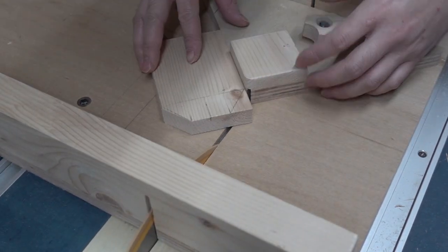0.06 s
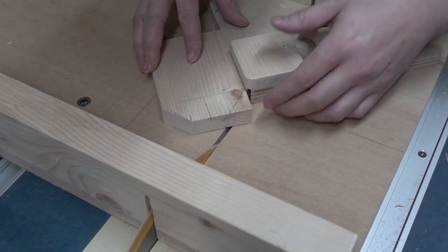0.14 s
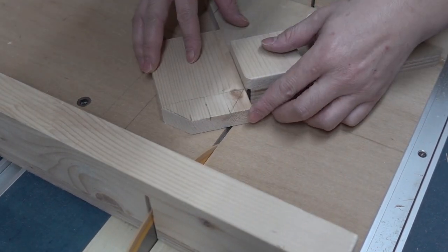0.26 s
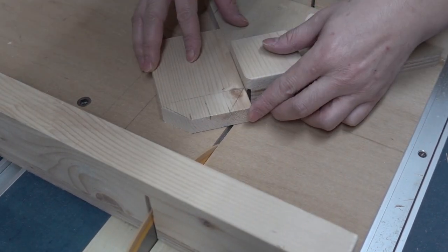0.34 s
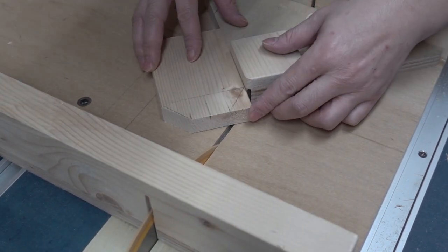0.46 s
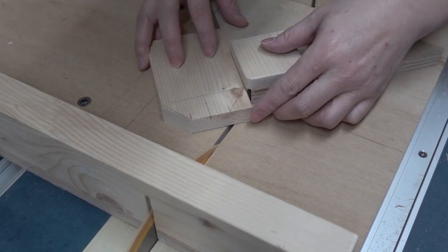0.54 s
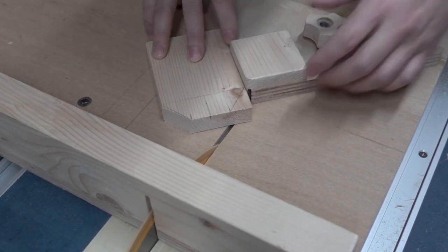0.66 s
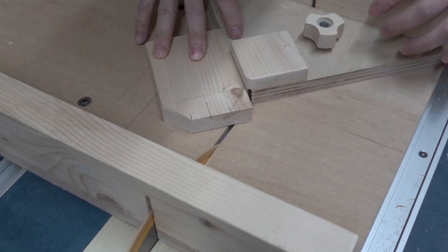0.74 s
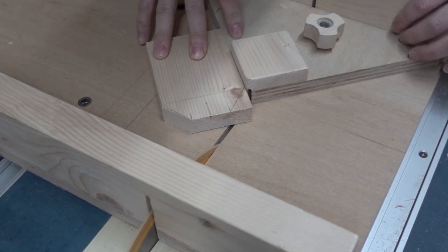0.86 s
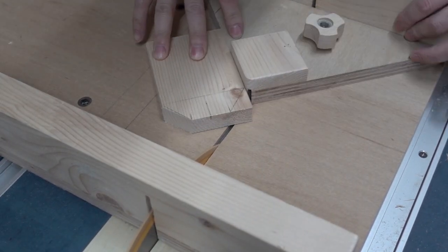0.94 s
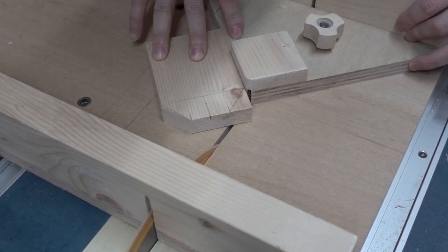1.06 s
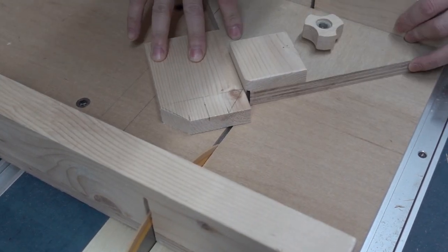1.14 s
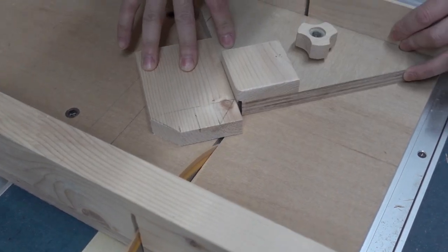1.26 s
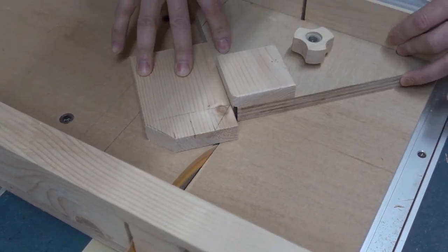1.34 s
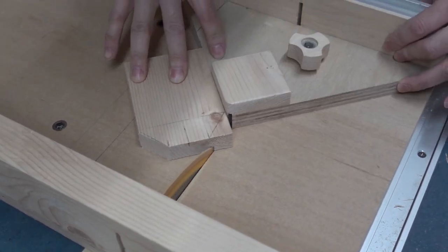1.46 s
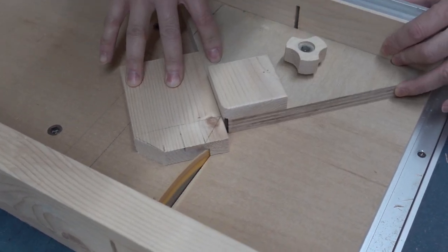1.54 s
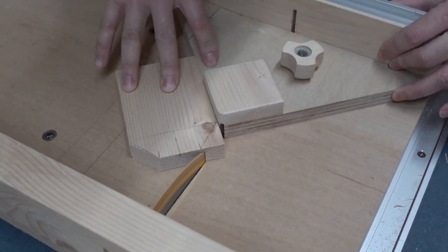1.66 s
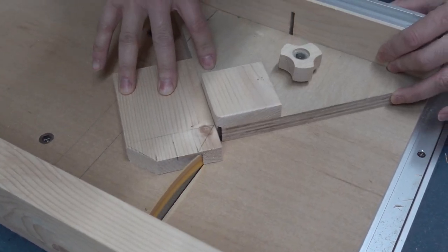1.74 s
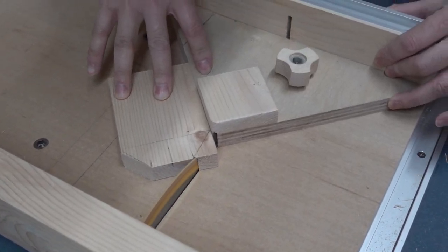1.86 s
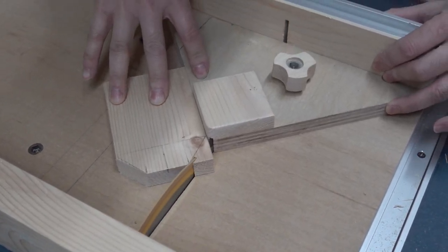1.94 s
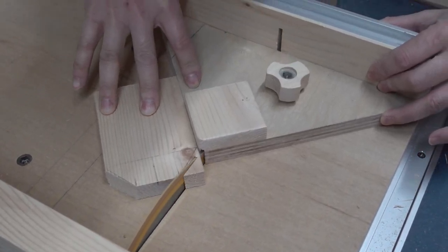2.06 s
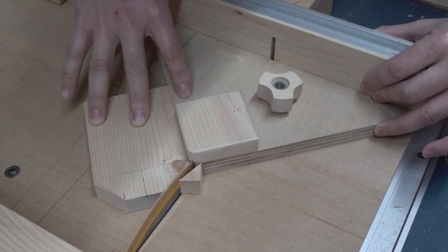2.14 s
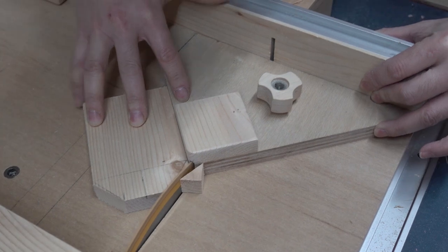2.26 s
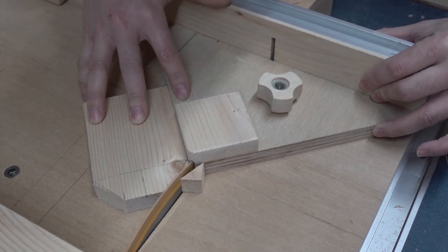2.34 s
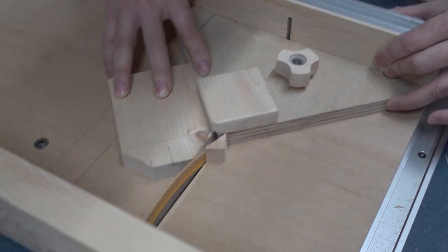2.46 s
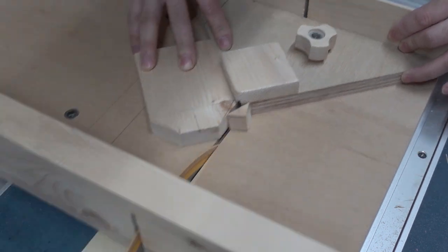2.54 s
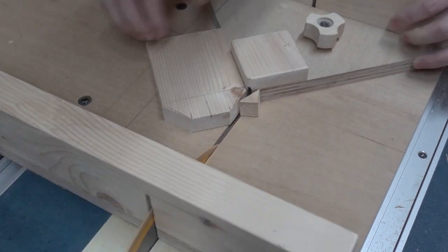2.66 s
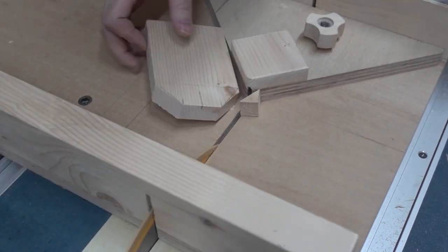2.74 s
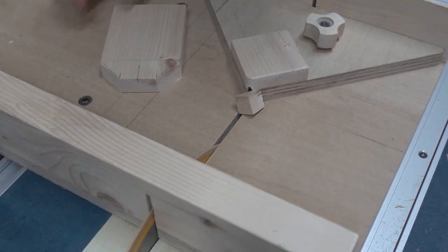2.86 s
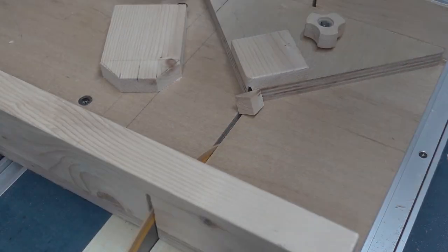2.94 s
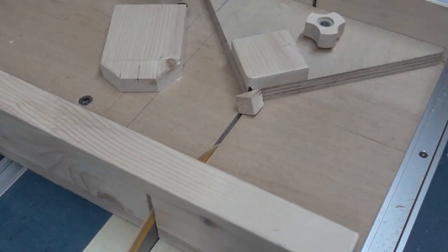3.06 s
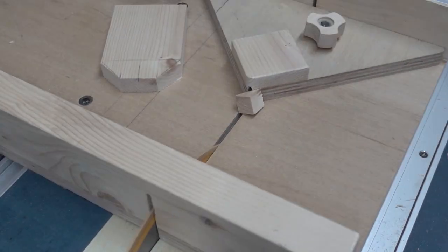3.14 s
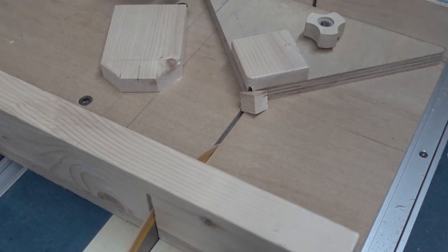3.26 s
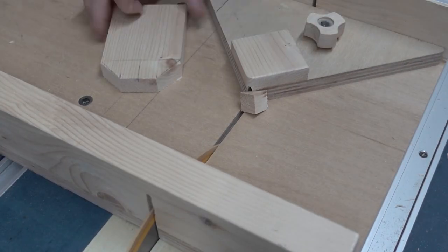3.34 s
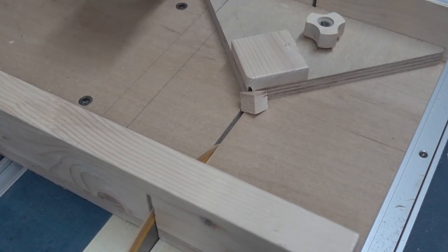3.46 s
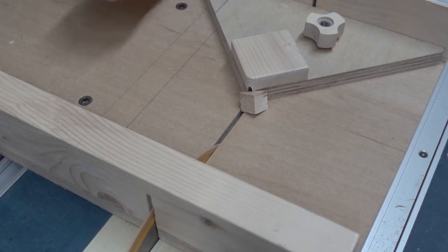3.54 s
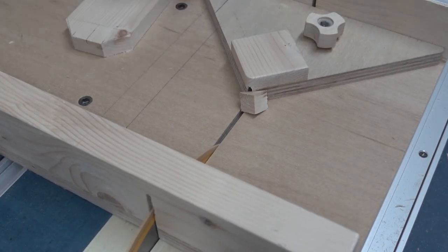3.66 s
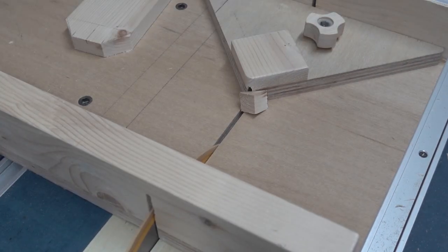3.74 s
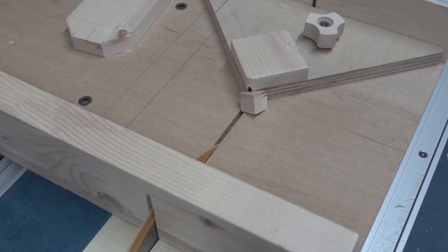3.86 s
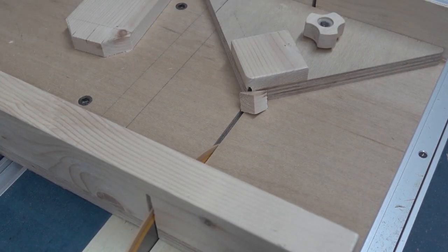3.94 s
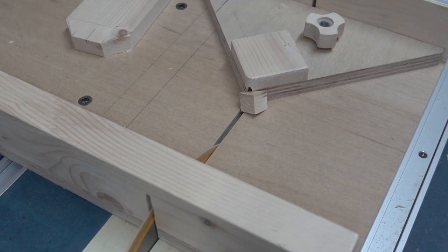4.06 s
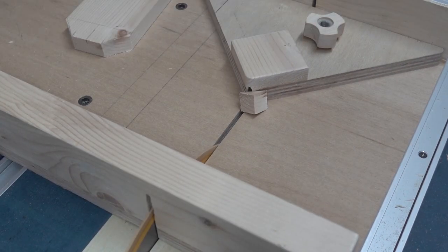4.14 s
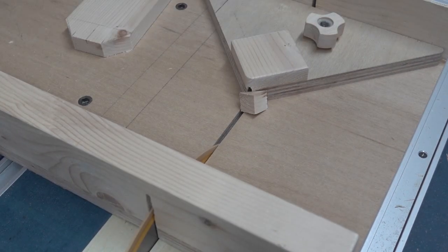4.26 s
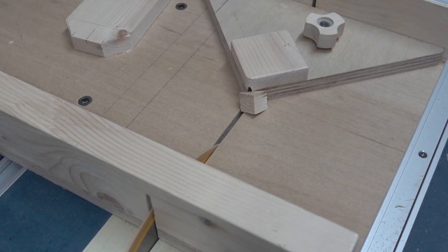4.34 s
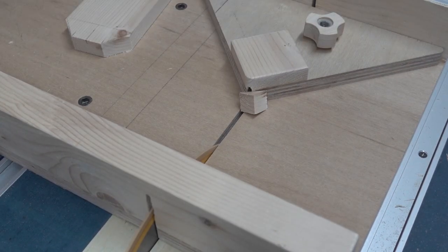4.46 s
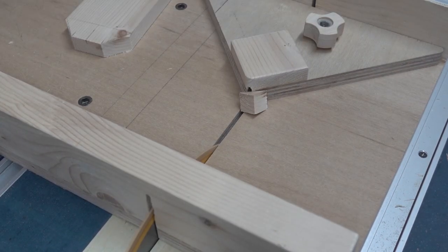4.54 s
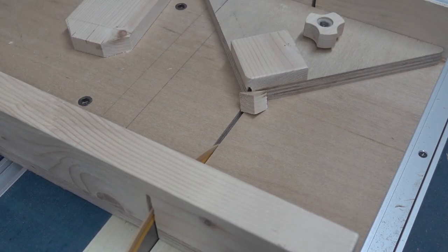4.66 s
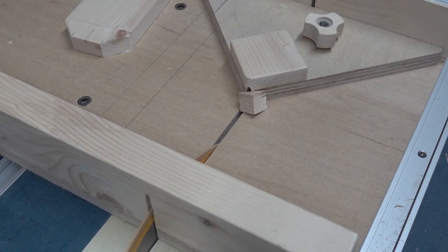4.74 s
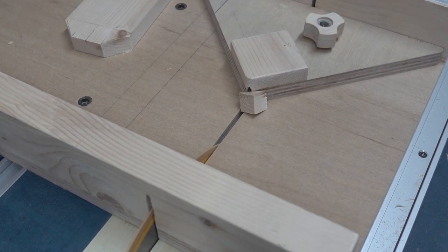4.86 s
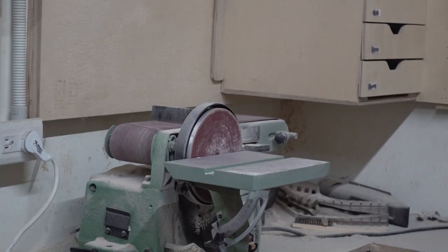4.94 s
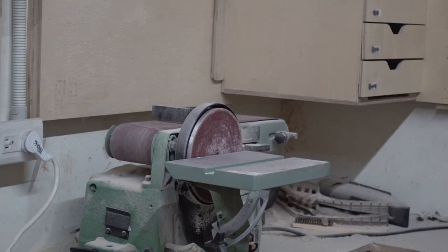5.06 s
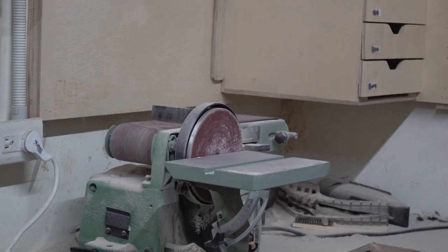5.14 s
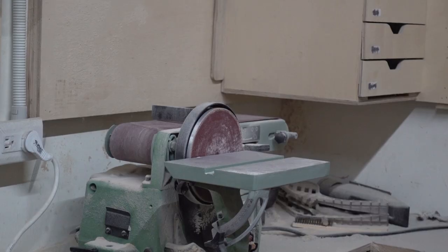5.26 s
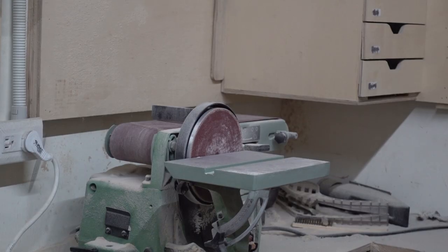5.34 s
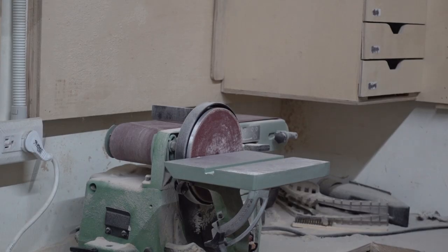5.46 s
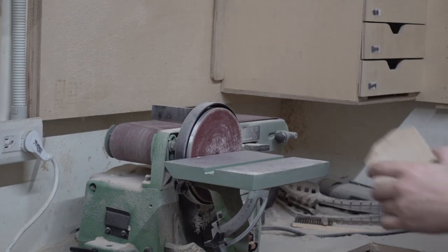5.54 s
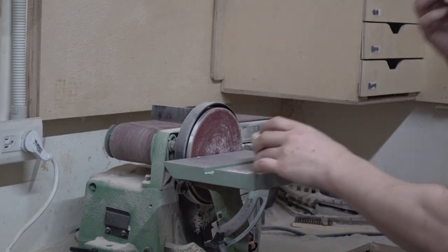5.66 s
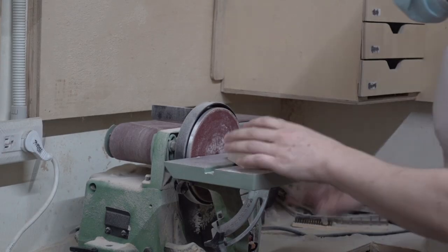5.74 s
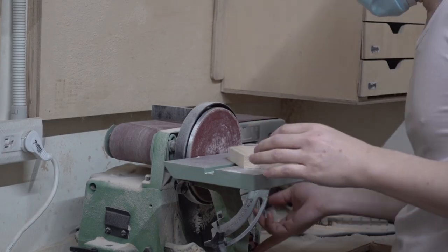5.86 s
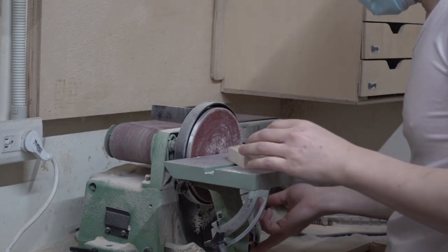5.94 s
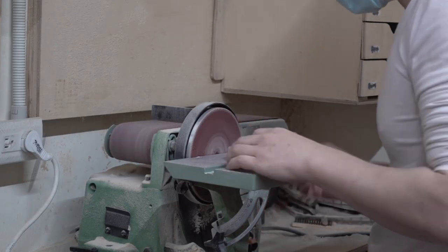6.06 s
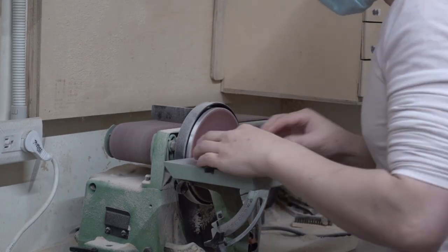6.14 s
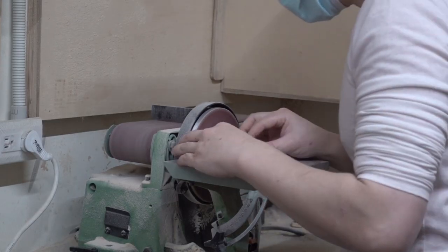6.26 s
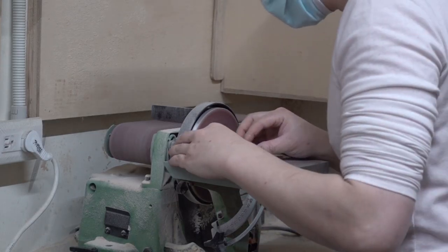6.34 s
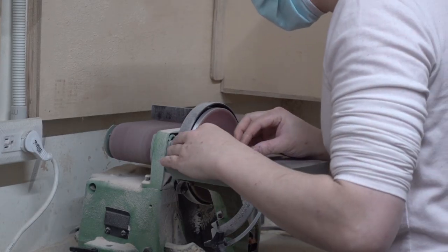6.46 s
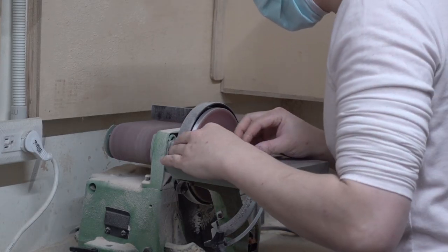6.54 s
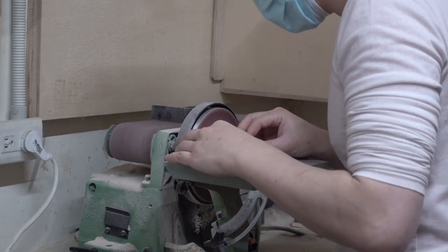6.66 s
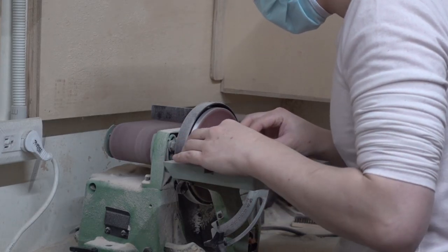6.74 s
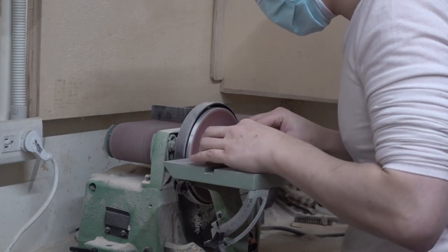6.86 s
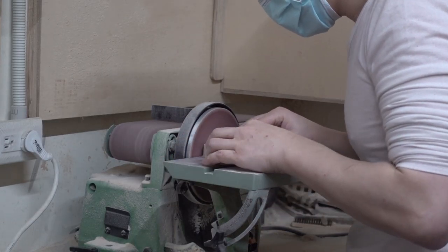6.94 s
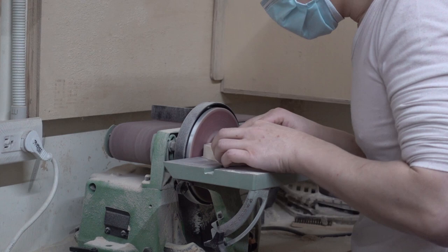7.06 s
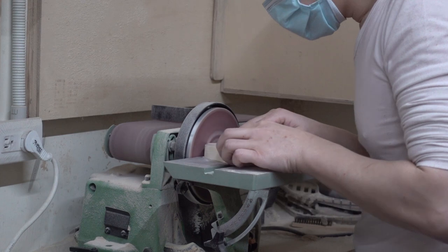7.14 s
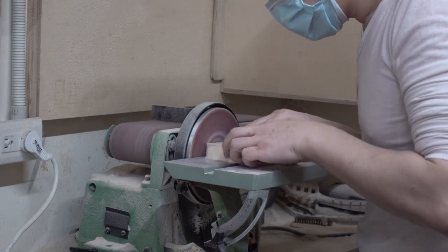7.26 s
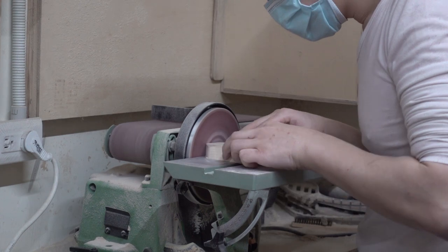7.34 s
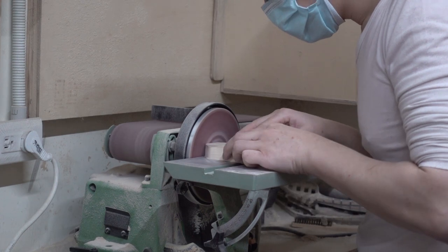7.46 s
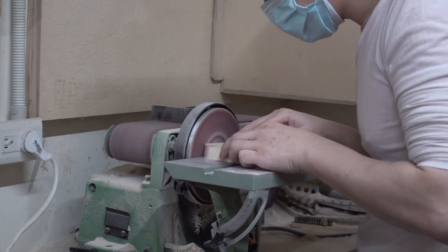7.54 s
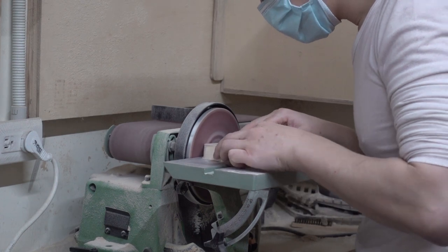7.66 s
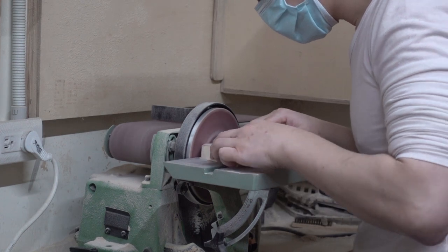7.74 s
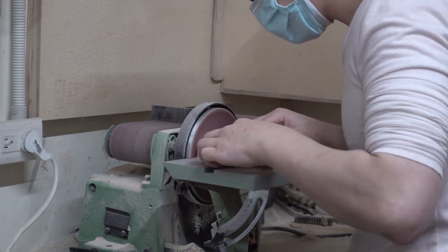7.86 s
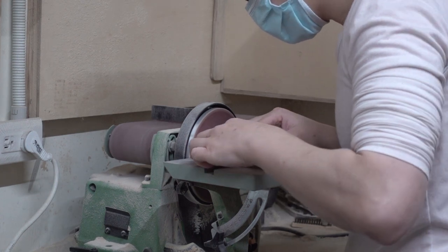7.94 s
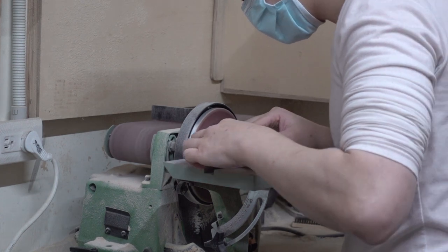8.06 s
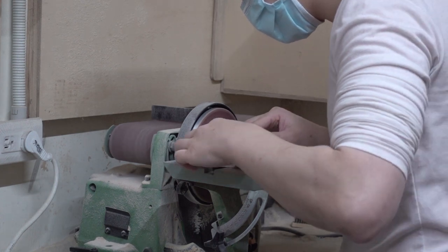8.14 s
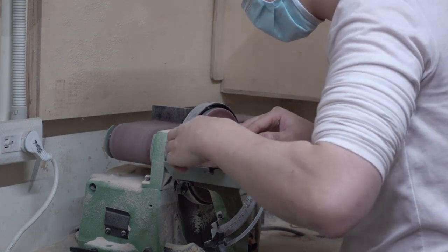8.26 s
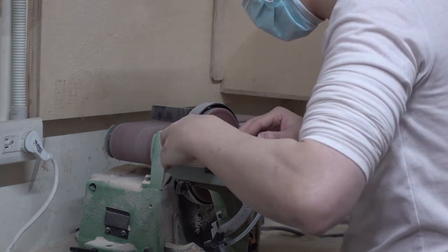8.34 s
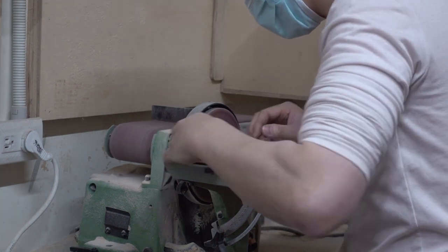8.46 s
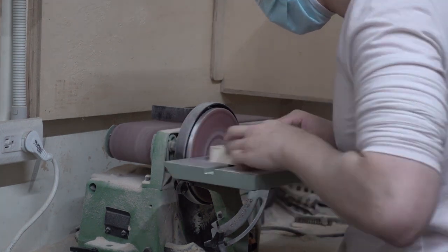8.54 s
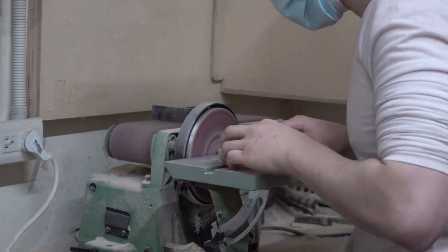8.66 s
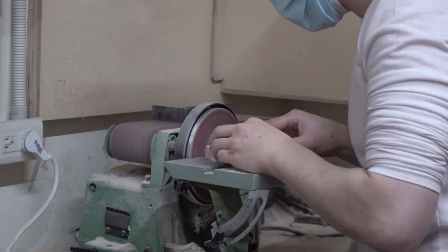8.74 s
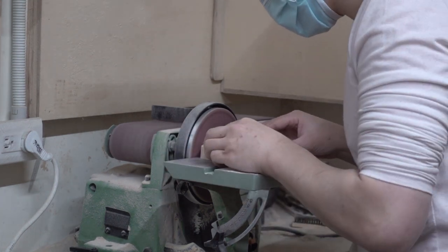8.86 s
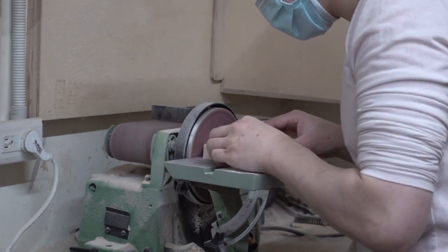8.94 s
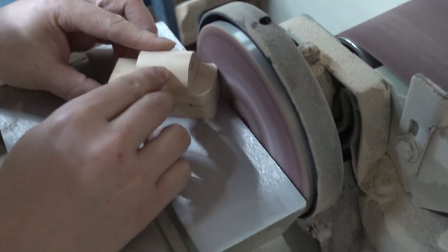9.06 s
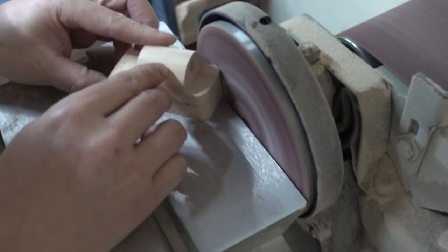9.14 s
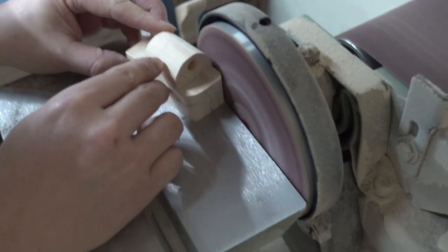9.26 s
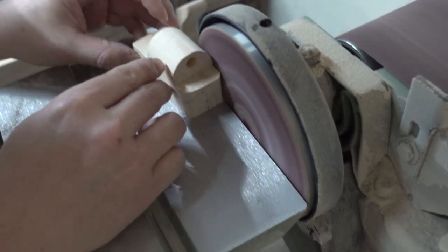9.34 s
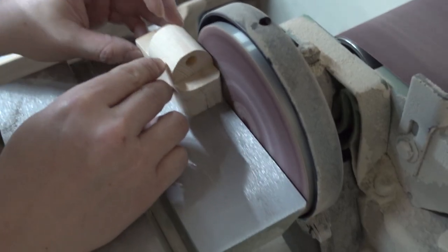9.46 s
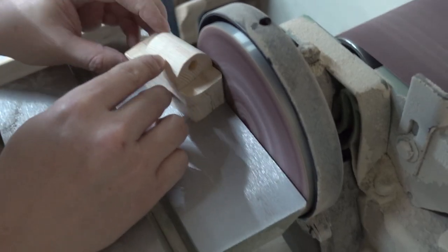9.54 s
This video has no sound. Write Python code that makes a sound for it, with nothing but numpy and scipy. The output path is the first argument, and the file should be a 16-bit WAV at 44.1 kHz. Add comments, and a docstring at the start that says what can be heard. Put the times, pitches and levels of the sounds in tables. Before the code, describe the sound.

From 0 s a table saw runs at full speed close by: a steady fan tone near 1.2 kHz with its octave, a very high thin whistle and a broad rush of torn air. At about 1.5 s it bites a wood block and the pitch sags until 2.1 s, then recovers quickly; the offcut grazes the blade with faint ringing until about 3.2 s. Switched off then, the tones glide steadily down, the treble dulls, and a rough metallic rattle and blade ring swell. At 5 s it stops abruptly, leaving soft shop hiss. Dry wooden clacks fall at 5.2 and 5.8 s, with light brushing, then a creaking switch snap near 6.05 s. A disc sander shudders and spins up almost at once, humming and grinding wood with gritty hiss and high squeaks, swelling and dipping. From 9.05 s it is heard closer, with a brief judder, grinding to the end.

```python
"""A table saw whines, sags as it trims a block, recovers, is switched off and coasts down: tones locked to
one motor speed, plus noise for the torn air. Abruptly a disc sander's place follows: wood clacks in the quiet
(noise through decaying wood modes), a switch snaps, the motor hums and a block is ground (scratch noise,
partly repeating each turn, through housing modes), heard from closer by for the last half second.
A soft shop rush lies under it all."""
import sys
import numpy as np
from scipy import signal
from scipy.fft import rfft, irfft
from scipy.io import wavfile

SR = 44100
rng = np.random.default_rng(int(sys.argv[2]) if len(sys.argv) > 2 else 0)


def materialize(psi):
    """Save the field psi as 16-bit PCM at rate SR to the path in sys.argv[1].

    A 1-D psi becomes a single channel; in a 2-D psi each row is a channel.
    """
    bounded = np.clip(np.atleast_2d(psi).T, -1, 1)
    quanta = np.round(bounded * 32767).astype(np.int16)
    wavfile.write(sys.argv[1], SR, quanta)


N = 423360
TIME = np.arange(N) / SR
FREQS = np.maximum(np.arange(N // 2 + 1) * SR / N, 1)

SAW_END_S, SANDER_ON_S, CLOSE_S = 4.972, 6.08, 9.05
FAN_HZ = 1160  # saw motor's cooling-fan pitch at full speed
DISC_HZ = 145.8  # sander turns per s outside the swells

# stereo width against pitch: pitch_hz, side_minus_mid_db
STEREO_WIDTH = [(100, -59), (500, -42), (1300, -56), (2800, -17.5), (5600, -7.5), (10000, -5), (14000, -2)]


def from_db(db):
    """Decibels to gain."""
    return 10 ** (np.asarray(db) / 20)


def rms_one(x):
    """Scale so that the mean of the channels has rms 1."""
    mid = np.atleast_2d(x).mean(axis=0)
    return x / np.sqrt(np.mean(mid ** 2) + 1e-20)


def in_time(rows):
    """Interpolate each column against the first, time in s, at every sample."""
    time_s, *columns = np.transpose(rows)
    return [np.interp(TIME, time_s, column) for column in columns]


def gain_at(points, hz=FREQS):
    """Gain of a dB spectrum, interpolated on a log-frequency axis."""
    point_hz, point_db = np.array(points).T
    return from_db(np.interp(np.log(hz), np.log(point_hz), point_db))


def fade_in(at_s, length_s):
    """Smooth step from 0 to 1, centred on at_s."""
    return .5 + .5 * np.tanh((TIME - at_s) / length_s)


def held(start_s, end_s, ease_s):
    """Gate that eases open, holds and eases shut."""
    return fade_in(start_s, ease_s) - fade_in(end_s, ease_s)


def lifts(rows, ease_s):
    """Level changes in dB from (start, end, dB, ..) events, one curve per dB column."""
    return sum(np.outer(dbs, held(start_s, end_s, ease_s)) for start_s, end_s, *dbs in rows)


def bursts(rows, ease_s):
    """Gain of (start, end, dB) events, silent in between."""
    return sum(from_db(db) * held(start_s, end_s, ease_s) for start_s, end_s, db in rows)


def bells(rows):
    """Gain of bell-shaped (centre, dB, half length) events."""
    gain = 0
    for centre_s, db, half_s in rows:
        spread = np.minimum(((TIME - centre_s) / half_s) ** 2, 100)
        gain = gain + from_db(db) * np.exp(-.5 * spread)
    return gain


def drift(rate_hz):
    """Slow random curve of rms 1: low-passed noise made at SR / 20."""
    pole = np.exp(-40 * np.pi * rate_hz / SR)
    noise = rng.standard_normal(N // 20 + 2002)
    slow = signal.lfilter([1], [1, -2 * pole, pole * pole], noise)[2000:]
    return np.interp(np.arange(N) / 20, np.arange(len(slow)), rms_one(slow))


def phase_of(hz):
    """Running angle in radians of a pitch curve."""
    return 2 * np.pi * np.cumsum(hz) / SR


def resonances(modes, at_hz=FREQS):
    """Joint gain of (Hz, width Hz, dB) resonances, summed in power."""
    power = 0
    for hz, width_hz, db in modes:
        detuning = (at_hz ** 2 - hz ** 2) / (at_hz * width_hz)
        power = power + from_db(db) ** 2 / (1 + detuning ** 2)
    return np.sqrt(power)


def below(hz, order=4):
    """Power-complementary low-pass gain."""
    return 1 / np.sqrt(1 + (FREQS / hz) ** (2 * order))


def above(hz, order=4):
    """The matching high-pass gain."""
    return np.sqrt(1 - below(hz, order=order) ** 2)


def stereo_noise(colour, source=None):
    """Coloured noise of mid rms 1; the side follows the width table."""
    noise = rng.standard_normal((2, N)) if source is None else source
    mid, side = rfft(noise) * colour
    side = side * gain_at(STEREO_WIDTH)
    return rms_one(irfft(np.array([mid + side, mid - side]), N))


def tone(angle, hz):
    """Sine of mid rms 1; a quadrature side part puts the channels out of step, by pitch."""
    angle = np.mod(angle + rng.uniform(0, 2 * np.pi), 2 * np.pi).astype(np.float32)
    mid = np.sin(angle)
    side = np.cos(angle) * gain_at(STEREO_WIDTH, hz) * rng.choice([-1, 1])
    return np.sqrt(2) * np.array([mid + side, mid - side])


def rough_tone(angle, hz, width_hz):
    """Tone whose height and phase flutter at random."""
    flutter = (drift(width_hz) + 1j * drift(width_hz)) / np.sqrt(2)
    return np.abs(flutter) * tone(angle + np.angle(flutter), hz)


def reflections(strength, longest_s, count=14):
    """Comb gain of echoes from nearby boards; long waves bend round them."""
    echoes = np.zeros(N)
    delays = (rng.uniform(.1, 1, count) * longest_s * SR).astype(int)
    echoes[delays] = strength * rng.choice([-1, 1], count)
    return np.abs(1 + rfft(echoes) * above(570, order=1))


def shop():
    """Steady soft noise, and a faint whine that comes and goes."""
    # pitch_hz, level_db
    shop_spectrum = [(30, -30), (110, -35), (200, -25.5), (330, -11), (420, -16.5), (540, -5), (800, -7),
                     (1000, -6.5), (1400, -5), (4000, -11), (9000, -17.5), (15600, -24.5)]
    # centre_s, level_db, half_length_s
    shop_whine = [(5.1, -52, .07), (5.55, -63, 0.079), (5.97, -54, .07)]
    rush = from_db(-48) * stereo_noise(gain_at(shop_spectrum))
    whine = bells(shop_whine) * from_db(3.4 * drift(7.1)) * tone(2 * np.pi * 990 * TIME, 990)
    return rush + whine


def handling():
    """Knocks ring the wooden modes nearest their contact pitch; a hand brushes by, the switch creaks."""
    # wood pieces and switch: start_s, level_db, t60_s, contact_pitch_hz, snap_rel_db
    knocks = [(5.2077, -15, 0.087, 2440, -11), (5.2468, -23.5, 0.089, 2600, -4.5),
              (5.767, -30, 0.16, 3500, -12), (5.785, -20.5, 0.088, 4800, -23),
              (6.0463, -27, 0.13, 2200, 6.5)]
    # pitch_hz, width_hz, level_db
    knock_modes = [(1120, 160, -1), (1530, 110, 6), (2160, 190, -1.5), (2700, 310, -8), (3375, 220, -4.5),
                   (3800, 200, -2), (4300, 250, -4), (4780, 230, -1), (5240, 300, -3), (8640, 560, -13)]
    # sleeve and hand: centre_s, level_db, half_length_s
    brushes = [(5.538, -42.5, 0.016), (5.69, -55, .03), (6.03, -48, 0.017)]
    # time_s, pitch_hz, level_db
    switch_creak = [(5.98, 905, -70), (6.005, 1000, -49), (6.025, 1380, -41), (6.045, 1420, -47),
                    (6.06, 1420, -80)]

    body = resonances(knock_modes) * above(800)
    snap = stereo_noise(above(770) * below(10700, order=3))
    out = bells(brushes) * stereo_noise(above(880) * below(4000, order=1))
    for start_s, db, t60_s, pitch_hz, snap_db in knocks:
        age_s = np.maximum(TIME - start_s, 0)
        decay = from_db(db - 60 * np.minimum(age_s / t60_s, 2))
        attack = 1 - np.exp(-age_s / 0.0003)
        contact = resonances([(pitch_hz, .9 * pitch_hz, 0)])
        out += decay * attack * (stereo_noise(body * contact) + from_db(snap_db) * snap)

    creak_hz, creak_db = in_time(switch_creak)
    creak = tone(phase_of(creak_hz) + .8 * drift(120), 1400)
    out += from_db(creak_db + 2.5 * drift(90)) * fade_in(5.98, .005) * creak
    # small things radiate no bass
    return signal.sosfilt(signal.butter(4, 420, "high", fs=SR, output="sos"), out)


def saw_speed():
    """Fan pitch: steady, sagging in the cut, recovering, then coasting against air drag and friction."""
    cut_from_s, cut_to_s, off_s = 1.47, 2.07, 3.165
    sag_hz_per_s, recover_s = 105, .27
    drag_per_s, friction_hz = .645, 20
    sag_hz = sag_hz_per_s * np.clip(TIME - cut_from_s, 0, cut_to_s - cut_from_s)
    driven_hz = FAN_HZ - sag_hz * np.exp(-np.maximum(TIME - cut_to_s, 0) / recover_s)
    coast = np.exp(-drag_per_s * np.maximum(TIME - off_s, 0))
    return (driven_hz + friction_hz) * coast - friction_hz


def saw_fan(fan_hz, slowed_oct):
    """Fan tone and octave swell as they glide through the cabinet's standing waves, fading with speed."""
    # standing waves: pitch_hz, width_hz, level_db
    cabinet_modes = [(424, 12, 1), (490, 23, 3), (548, 22, 1.5), (666, 35, 3), (984, 65, 7),
                     (1146, 27.4, 2), (1474, 45, 11), (1780, 48, 10), (1950, 90, 9), (2277, 27, 6.5),
                     (2320, 9, 0.5)]
    # octave swells or dips: start_s, end_s, change_db
    octave_lifts = [(1.47, 1.9, -3), (2.25, 2.52, 4), (2.62, 2.95, -1.5), (3.0, 3.22, 6.5), (3.52, 3.64, 4)]
    # levels before the cabinet's gain
    fan_db, octave_db, fade_db_per_octave = -34, -39, 3.5
    octave_db = octave_db + lifts(octave_lifts, ease_s=0.052)
    angle, out = phase_of(fan_hz), 0
    for order, db in ((1, fan_db), (2, octave_db)):
        level = from_db(db - fade_db_per_octave * slowed_oct + 1.0 * drift(11.6))
        cabinet = resonances(cabinet_modes, order * fan_hz)
        out = out + level * cabinet * tone(order * angle, order * FAN_HZ)
    return out


def saw_whine(fan_hz, slowed_oct):
    """Shaft, teeth and drive tones follow the motor speed; the blade set singing keeps its own pitch."""
    # blade and drive at full speed: pitch_hz, rel_level_db
    drive_tones = [(920, -55), (1518, -43), (2900, -40.5), (3601, -32.5), (4560, -34), (4640, -38.5),
                   (5039, -43), (6476, -35), (6718, -38.5), (7677, -35), (8637, -34.5), (9356, -39),
                   (9835, -36.5), (10557, -42), (10837, -41), (11036, -47), (11994, -47), (13194, -28),
                   (13674, -42), (13916, -35)]
    # blade set singing by the offcut: pitch_hz, rel_level_db
    blade_tones = [(5017, -35.5), (6476, -43), (6928, -33.5), (9033, -35)]
    # whistle swells or dips: start_s, end_s, change_db
    whistle_bites = [(1.35, 1.88, 5), (1.95, 2.5, -2), (3.2, 3.65, 3)]
    # wood damps the blade's tones: start_s, end_s, change_db
    damping = [(1.43, 2.5, -7.5), (2.5, 5, -3)]
    # offcut touches the blade: start_s, end_s, rel_level_db
    grazes = [(1.95, 2.13, -1.5), (2.13, 2.72, -16), (2.73, 2.88, 5.5), (2.88, 3.25, -2.5)]
    shaft_hz, shaft_db, growl_db = 237, -68, -68
    whistle_hz, whistle_db, whistle_fade_db_per_octave = 14397, -27, 4.5  # teeth at full speed
    drive_db, drive_fade_db_per_octave = -1, 33

    turn = phase_of(fan_hz / FAN_HZ)
    out = from_db(shaft_db) * (1 - fade_in(3.3, .15)) * tone(shaft_hz * turn, shaft_hz)
    # arbor under load
    growl = sum(tone(order * shaft_hz * turn, shaft_hz) for order in (3 / 2, 2))
    out += from_db(growl_db) * held(1.66, 2.75, .1) * growl

    whistle_db = whistle_db + lifts(whistle_bites, ease_s=0.035) - whistle_fade_db_per_octave * slowed_oct
    whistle = tone(whistle_hz * turn + .5 * drift(40), whistle_hz)
    whistle = from_db(whistle_db + 2.4 * drift(21)) * whistle
    # the narrow beam falls more on the left
    out += whistle * from_db(1.6 * np.array([[1], [-1]]))

    drive_db = drive_db + lifts(damping, ease_s=0.08) - drive_fade_db_per_octave * slowed_oct
    drive = sum(from_db(db + 1.6 * drift(5.5)) * tone(hz * turn, hz) for hz, db in drive_tones)
    singing = sum(from_db(db + 2.5 * drift(9.1)) * tone(2 * np.pi * hz * TIME + 0.39 * drift(17), hz)
                  for hz, db in blade_tones)
    return out + from_db(drive_db) * drive + bursts(grazes, ease_s=0.043) * singing


def saw_rush(fan_hz, slowed_oct):
    """Air torn by the teeth throbs with the blade; slowing, its low part grows louder, its treble fainter."""
    # air and chips: pitch_hz, level_db
    rush_spectrum = [(30, -36.5), (150, -36.5), (260, -37.5), (390, -37), (560, -32), (750, -23),
                     (1050, -12), (1320, -12), (1600, -7), (2100, -8), (2850, -5.5), (4500, -4),
                     (11500, -12), (15600, -12)]
    # chips fly, drive shakes, or wood muffles: start_s, end_s, body_change_db, treble_change_db
    surges = [(1.25, 1.44, 2.5, -0.5), (1.45, 2.14, -0.5, -0.5), (2.23, 2.5, 3, 2), (2.56, 2.64, 3, 1),
              (2.78, 3.2, 1, 0), (3.43, 3.7, 3, 3), (3.78, 3.94, 2.5, 2.5), (4.02, 4.13, 0.5, 3),
              (4.25, 4.6, 1.5, 0.5)]
    # full-speed levels and changes per octave of slowing
    full_body_db, body_rise_db_per_octave, flutter_db_per_octave = -26.5, 2.5, 1
    full_treble_db, dulling_db_per_octave = -20, 5

    body_db, treble_db = lifts(surges, ease_s=0.021)
    body_rise_db = slowed_oct * (body_rise_db_per_octave + flutter_db_per_octave * drift(21))
    body_db = body_db + full_body_db + body_rise_db
    treble_db = treble_db + full_treble_db - slowed_oct * dulling_db_per_octave
    colour = gain_at(rush_spectrum) * reflections(strength=0.17, longest_s=.014)
    blade_turn = phase_of(fan_hz / 14.5)
    throb = 1 + 0.044 * np.sin(blade_turn) + .06 * np.sin(3 * blade_turn) + 0.066 * drift(60)
    body = from_db(body_db) * stereo_noise(colour * below(7600))
    treble = from_db(treble_db) * stereo_noise(colour * above(7960))
    return throb * (body + treble)


def saw_coasting(fan_hz):
    """The unloaded drive rattles in rough falling tones, lifted by the blade's modes, and the blade rings."""
    # drive rattle: multiple_of_fan_pitch, rel_level_db, swell_in_s, width_hz
    coast_orders = [(2.99, -47, 3.8, 22), (5.02, -43, 3.37, 15), (5.77, -34.5, 3.55, 14),
                    (5.94, -31, 3.9, 13), (6.28, -37, 3.7, 38), (6.98, -32.5, 4.4, 17),
                    (9.13, -40, 4.5, 20), (11.5, -36, 4.0, 40), (11.8, -35.5, 3.9, 30),
                    (11.98, -31.5, 3.68, 36), (12.7, -37, 4.9, 46), (14.1, -43, 3.95, 28),
                    (17.96, -32, 4.04, 30), (24, -39, 4.3, 70), (30.5, -44, 4.4, 120)]
    # ringing steel: pitch_hz, width_hz, level_db
    blade_modes = [(2650, 4300, -10.5), (4400, 360, 2), (7720, 270, 11.5), (14800, 300, 7.5)]
    sweep_gain, ring_from_s, ring_db = 0.54, 3.62, -24.5
    angle, out = phase_of(fan_hz), 0
    for order, db, from_s, width_hz in coast_orders:
        swell = from_db(db + 3.7 * drift(4.6)) * fade_in(from_s, 0.11)
        lift = 1 + sweep_gain * resonances(blade_modes, order * fan_hz)
        out = out + swell * lift * rough_tone(order * angle, order * FAN_HZ * 0.43, width_hz)
    ring = from_db(ring_db + 0.71 * drift(6)) * fade_in(ring_from_s, 0.1)
    return out + ring * stereo_noise(resonances(blade_modes) * above(1100))


def table_saw():
    """Fan, whine, rush and coasting rattle share one motor speed, until the place changes."""
    fan_hz = np.maximum(saw_speed(), 100)
    slowed_oct = np.log2(FAN_HZ / fan_hz)  # octaves below full speed
    sound = saw_fan(fan_hz, slowed_oct) + saw_whine(fan_hz, slowed_oct)
    sound = sound + saw_rush(fan_hz, slowed_oct) + saw_coasting(fan_hz)
    return sound * (1 - fade_in(SAW_END_S, 0.0039))


def grit(bite, disc_turn):
    """Scratches: part fresh noise, part the same evenly spread grains coming round on every turn."""
    count = round(SR / DISC_HZ / 2)
    track = irfft(np.exp(2j * np.pi * rng.random((2, count))))
    place = (disc_turn / (2 * np.pi) % 1 * track.shape[1]).astype(int)
    repeat_share = np.clip(bite, 0, 1)
    repeating = track[:, place] / track.std()
    fresh = rng.standard_normal((2, N))
    return np.sqrt(repeat_share) * repeating + np.sqrt(1 - repeat_share) * fresh


def squeaks():
    """High wood notes come and go and bend as the contact shifts."""
    # pitch_hz, width_hz, rel_level_db
    squeak_modes = [(11320, 160, -1), (11930, 150, 1.5), (12300, 140, -6), (12900, 140, -3),
                    (13000, 160, -1), (13500, 140, -5), (13800, 140, -1), (14240, 140, -15),
                    (14700, 220, -1)]
    notes = 0
    for hz, width_hz, db in squeak_modes:
        angle = phase_of(hz * (1 + .007 * drift(2)))
        notes = notes + from_db(db + 4 * drift(3.5)) * rough_tone(angle, hz, width_hz)
    return rms_one(notes)


def sanding(disc_turn, swell_db, swell_hiss_db, judder, close):
    """Grit scratches the wood, shakes the housing and squeaks; the table rings when heard close by."""
    # grinding: pitch_hz, level_db
    sander_spectrum = [(30, -40), (250, -27), (400, -27.5), (500, -13.5), (700, -11), (880, -9.5),
                       (1300, -3.5), (1950, -4.5), (3000, -3), (5900, -6), (7900, -1.5), (8900, -7),
                       (12000, -7.5), (15600, -15)]
    # housing: pitch_hz, width_hz, level_db
    sander_modes = [(887, 44, 5), (1260, 44, 3), (1630, 150, 0.5), (2340, 130, 0), (3300, 50, -7),
                    (3520, 29, -8), (4330, 37, -5), (5400, 180, -2), (7630, 100, -7), (7900, 60, -16)]
    # table from close by: pitch_hz, width_hz, level_db
    close_modes = [(1070, 96, 3), (1250, 150, -1), (1660, 200, 0), (3250, 330, -4), (4230, 80, 0),
                   (5400, 110, 2), (7170, 200, 1)]
    # wood on grit: start_s, end_s, level_db
    squeak_events = [(6.32, 6.42, -26.5), (6.42, 6.88, -28), (6.88, 7.5, -34), (7.5, 8.48, -30.5),
                     (8.86, 9.06, -28), (9.06, 9.55, -32.5), (9.56, 9.7, -27)]
    machine_db, hiss_db = -32, -26.5  # outside the swells
    bite = 0.1 + 0.14 * judder  # share of scratches repeating each turn

    colour = gain_at(sander_spectrum) * (1 + 1.0 * resonances(sander_modes))
    colour = colour * reflections(strength=0.11, longest_s=.012)
    machine_level = from_db(machine_db + swell_db - 0.86 * close + 0.34 * drift(3.9))
    machine = machine_level * stereo_noise(colour * below(4130, order=6), grit(bite, disc_turn))
    hiss_level = from_db(hiss_db + swell_hiss_db - 1.2 * close)
    hiss = hiss_level * stereo_noise(colour * above(3470, order=6), grit(1.5 * bite, disc_turn))
    squeak = bursts(squeak_events, ease_s=.015) * squeaks()
    table = from_db(-32) * close * stereo_noise(resonances(close_modes) * above(800))
    # the disc wobbles once a turn, the belt joint passes more slowly
    wobble = 0.095 * np.sin(disc_turn)
    joint = 0.056 * np.sin(2 * np.pi * 31.7 * TIME)
    throb = 1 + wobble + joint + 0.077 * drift(40)
    return throb * (machine + hiss + squeak + table)


def disc_tones(orders, disc_turn, waver_db):
    """Whines locked to the turning disc, wavering at random."""
    return sum(from_db(db + waver_db * drift(9)) * tone(order * disc_turn + 0.35 * drift(25), order * DISC_HZ)
               for order, db in orders)


def sander():
    """Motor hums, disc and bearings sing, the block is ground; from close by the motor is fainter."""
    # louder between dips, as when an arm passes in front: start_s, end_s, machine_change_db, hiss_change_db
    swells = [(6.1, 6.68, 5.5, 4), (6.97, 7.57, 5, 3), (7.62, 7.75, 4.5, 3.5), (7.77, 8.17, 3, 2.5),
              (8.42, 9.26, 5.5, 3.5), (9.46, 9.7, 5, 2)]
    # block judders on the table: start_s, end_s, rel_level_db
    judders = [(9.05, 9.27, 0.5), (9.27, 9.7, -10.5)]
    # multiple_of_disc_speed, rel_level_db
    disc_whine = [(11, -45.5), (16, -37.5), (20, -42.5), (22, -42.5)]
    # judder: multiple_of_disc_speed, rel_level_db
    chatter_orders = [(7, -43), (11, -42), (13, -36.5), (15, -41), (18, -36), (21, -36), (22, -36),
                      (23, -32), (24, -38), (33, -39), (42, -36)]
    # pitch_hz, rel_level_db
    bearing_tones = [(2137, -44), (2294, -42.5), (2842, -37.5), (3558, -45.5), (4980, -39), (6971, -42),
                     (7687, -41)]
    # frame as the motor starts: centre_s, level_db, half_length_s
    shudders = [(6.091, -23, 0.012), (6.18, -25, 0.037)]
    # pitch_hz, width_hz, level_db
    frame_modes = [(250, 42, -31), (515, 68, -1.5), (865, 78, -5), (1064, 92, 7), (2560, 330, 1),
                   (2880, 270, 4), (3220, 220, 5)]
    disc_sag_hz_per_db, chatter_width_hz = .13, 13  # the disc turns a little slower in the swells
    whine_start_db, whine_rise_db_per_s = -3.5, 2
    hum_hz, hum_db, hum_swell_share = 360.6, -44, 0.73  # level outside the swells

    swell_db, swell_hiss_db = lifts(swells, ease_s=.035)
    close, judder = fade_in(CLOSE_S, 0.0046), bursts(judders, ease_s=0.023)
    disc_turn = phase_of(DISC_HZ - disc_sag_hz_per_db * swell_db)

    whine_db = whine_start_db + whine_rise_db_per_s * (TIME - SANDER_ON_S) - 19 * close
    whine = from_db(whine_db) * disc_tones(disc_whine, disc_turn, waver_db=2.0)
    chatter = judder * sum(from_db(db) * rough_tone(order * disc_turn, order * DISC_HZ, chatter_width_hz)
                           for order, db in chatter_orders)
    bearings = 0
    for hz, db in bearing_tones:
        level = from_db(db - 12 * close + 3.2 * drift(6.3))
        bearings = bearings + level * tone(2 * np.pi * hz * TIME + 0.3 * drift(16.0), hz)
    hum_level = from_db(hum_db + hum_swell_share * swell_db - 10.7 * close)
    hum = hum_level * tone(2 * np.pi * hum_hz * TIME, hum_hz)
    unbalance = from_db(-77.5) * tone(disc_turn, DISC_HZ)
    shudder = bells(shudders) * stereo_noise(resonances(frame_modes) * above(200) * below(5200))

    ground = sanding(disc_turn, swell_db, swell_hiss_db, judder, close)
    turning = ground + whine + chatter + bearings + unbalance
    spin_up = fade_in(6.15, 0.054)
    return (turning * spin_up + shudder + hum) * fade_in(SANDER_ON_S, 0.005)


def scene():
    """Handling and both machines over the shop."""
    return shop() + handling() + table_saw() + sander()


def record(dry):
    """The left microphone is a little brighter than the right; the top is cut steeply."""
    treble = signal.sosfilt(signal.butter(1, 9000, "high", fs=SR, output="sos"), dry)
    heard = dry + 0.025 * treble * np.array([[1], [-1]])
    cutoff_hz = 15800
    return signal.sosfilt(signal.ellip(12, .2, 80, cutoff_hz, fs=SR, output="sos"), heard)


dry = scene()
out = record(dry)
materialize(out)
```